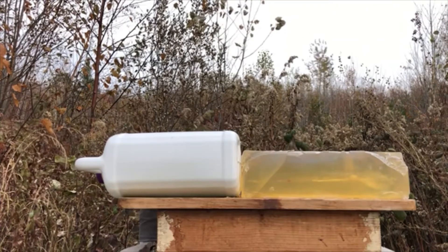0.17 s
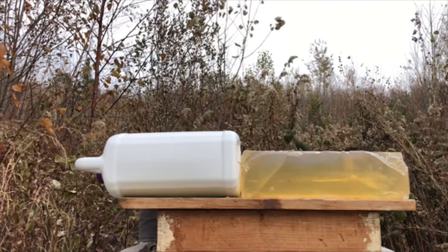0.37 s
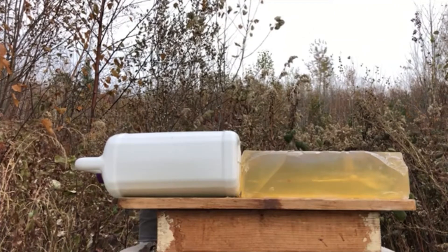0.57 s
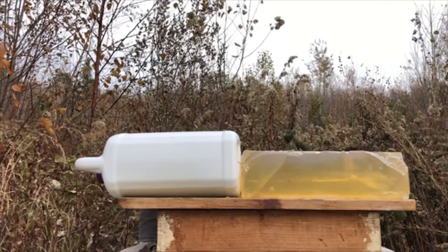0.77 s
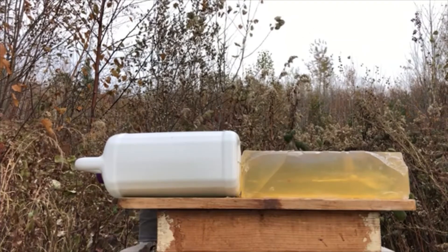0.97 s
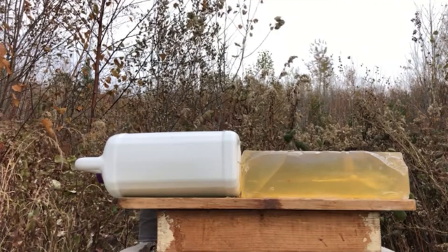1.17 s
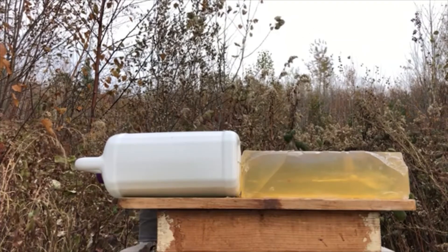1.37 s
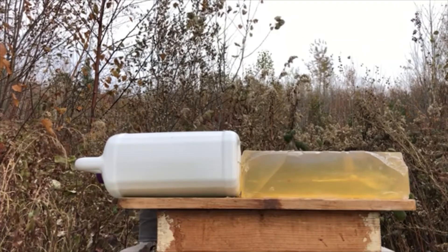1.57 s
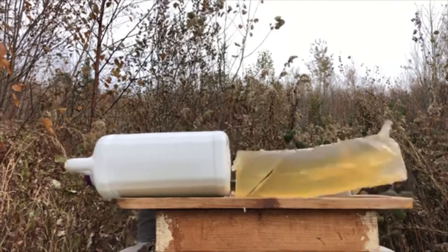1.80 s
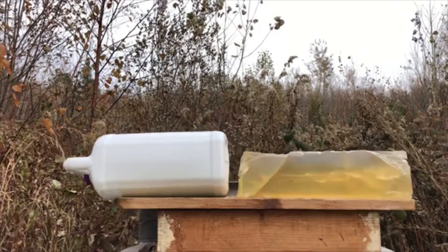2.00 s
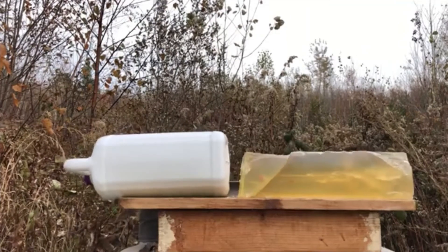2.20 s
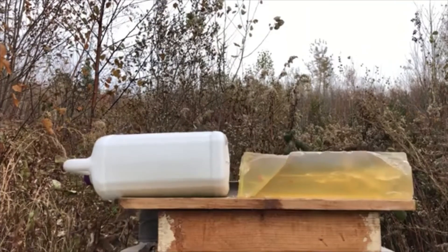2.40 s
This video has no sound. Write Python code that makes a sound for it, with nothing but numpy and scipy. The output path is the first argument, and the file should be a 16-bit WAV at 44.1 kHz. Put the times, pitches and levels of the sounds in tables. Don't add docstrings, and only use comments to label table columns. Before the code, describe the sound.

One close gunshot hits a plastic jug in scrubby woods, echoes rolling back and fading quickly

```python
import sys
import numpy as np
from scipy import signal
from scipy.fft import rfft, irfft, next_fast_len
from scipy.io import wavfile
from scipy.ndimage import map_coordinates

SR = 44100
rng = np.random.default_rng(int(sys.argv[2]) if len(sys.argv) > 2 else 0)


def int16_out(signal):
    q = np.round(np.clip(np.atleast_2d(signal).T, -1, 1) * 32767)
    wavfile.write(sys.argv[1], SR, q.astype(np.int16))


def rack_gain(trim_db):
    fader = np.asarray(trim_db, float)
    return 10 ** (fader / 20)


N = 107868
TOP_HZ = 15200

# (time [s], level [dB])
WIND = [
    (0, -63),
    (.3, -65),
    (.9, -68),
    (1.2, -69),
    (1.6, -68),
]
# (frequency [Hz], level [dB per Hz])
LEAF_COLOUR = [(70, -25), (120, -3), (300, -6), (700, -7), (1100, -10), (1400, -15), (2200, -24),
               (4000, -40)]
# (frequency [Hz], level [dB per Hz])
HISS_COLOUR = [(940, -30), (1600, 0), (2360, -4), (5500, -2.5), (7600, -8.5), (14300, -17.5), (15200, -22)]
HISS_DB = -71.3
# (frequency [Hz], level [dB per Hz])
RUMBLE_COLOUR = [(13, -39), (22, -9), (43, -1), (60, 0), (160, -11), (210, -41), (350, -120)]
RUMBLE_DB = -70.6
# (time [s], pitch [Hz], level [dB])
WHINE = [
    (0, 1241, -70),
    (.1, 1241, -67),
    (.17, 1241, -80),
    (.23, 1241, -74),
    (.5, 1241, -86),
    (1.09, 1242, -86),
    (1.13, 1242, -71),
    (1.3, 1243, -73),
    (1.5, 1243, -68),
]
DRONE_HZ, DRONE_WIDTH_HZ, DRONE_DB = 728, 12, -74.5
DUCK_S, DUCK_DB, RECOVER_S, RECOVER_DB_PER_S = 1.61, -14, 2.25, 25

# (time [s], peak [dB], pitch [Hz], half
# length [s])
KNOCKS = [(1.6215, -12, 755, .007), (1.623, -13, 1480, .006), (1.627, -32, 55, .007),
          (1.681, -30, 72, .008), (1.868, -55, 300, .008), (1.883, -40, 400, .009), (1.885, -60, 85, .014),
          (.2645, -56, 3760, .0008), (1.992, -65, 165, .014), (2.255, -62, 380, .012),
          (2.297, -72, 160, .012), (2.306, -59, 370, .01)]

# (time [s], peak [dB], pitch [Hz])
CRUMBS = [(.2885, -65, 5200), (1.2134, -65, 5400), (1.858, -55, 11000), (1.9724, -58, 10000),
          (2.0144, -68, 11000), (2.0194, -65, 11000), (2.03, -66, 13000), (2.1234, -67, 9500),
          (2.1374, -63, 13500), (2.18, -60, 3500), (2.1864, -58, 5000), (2.2124, -66, 8000),
          (2.2333, -59, 5500), (2.241, -65, 12000), (2.2974, -69, 7000), (2.3154, -65, 6000),
          (2.4385, -63, 11000)]
CRUMB_FADE_S, CRUMB_WIDTH = .002, .85
# (start [s], rise [s], hold [s], fall [s], level [dB])
PATTER = [
    (2.012, .008, .03, .012, -75),
    (2.12, .005, .03, .01, -80),
    (2.205, .01, .045, .02, -71),
    (2.27, .01, .045, .015, -77.5),
    (2.432, .004, .01, .01, -72),
]

# (start [s], rise [s], hold [s], fall [s], level [dB])
CRACK = [
    (1.6027, .001, .008, .001, -31),
    (1.613, .001, .005, .001, -38),
    (1.6213, .001, .005, .001, -32),
]
# (frequency [Hz], level [dB per Hz])
CRACK_COLOUR = [(180, -34), (300, -6), (1510, -2), (2300, -6), (3800, -12), (6000, -8), (12100, -13),
                (15200, -20)]
# (start [s], rise [s], hold [s], fall [s], level [dB])
BOOM = (1.606, .013, .009, .005, -9.6)
# (frequency [Hz], width [Hz], level [dB])
BOOM_BODY = [(210, 60, -13), (330, 90, -17), (500, 200, -2), (770, 260, 0.1), (1420, 420, -3.5),
             (2140, 280, -11), (2870, 300, -15)]
# (start [s], rise [s], hold [s], fall [s], level [dB])
SLAP = (1.6255, .001, .007, .0005, -11.5)
# (frequency [Hz], level [dB per Hz])
SLAP_COLOUR = [(1180, -38), (2000, -8), (4300, -3), (6000, -3), (11900, -7), (14900, -12), (15700, -30),
               (16500, -45)]
# (start [s], rise [s], hold [s], fall [s], level [dB])
THUMPS = [
    (1.606, .01, .02, .012, -44),
    (1.7, .02, .03, .065, -54),
]
# (frequency [Hz], level [dB per Hz])
THUMP_COLOUR = [(15, -12), (30, -3), (75, 0.1), (110, -4), (170, -10), (350, -16), (600, -45)]

# (start [s], rise [s], hold [s], fall [s], level [dB])
BRIEF_TONES = (1.63, .005, .011, .007, -15.5)
# (frequency [Hz], level [dB])
BRIEF_NOTES = [(211, -30), (414, -25), (503, -26), (597, -30), (1160, -26), (1215, -30), (1367, -29), (1638, -26.5),
               (3198, -31), (3698, -29), (5399, -31), (6153, -30)]

# (time [s], level [dB])
TREES = [
    (1.655, -25),
    (1.671, -31),
    (1.679, -23.5),
    (1.748, -22),
    (1.845, -37),
    (1.888, -36),
    (1.917, -44),
    (2.133, -54),
    (2.446, -56),
]
# (frequency [Hz], level [dB per Hz])
TREES_COLOUR = [(40, -36), (100, -27), (280, -23), (430, -13), (764, 0), (1120, -2), (1500, -9),
                (2300, -13), (8000, -62)]
# (frequency [Hz], loss [dB per s])
TREES_LOSS = [(60, 30), (180, 14), (330, -8), (800, 0.1), (2500, 2.5), (8000, 40)]
TRUNKS_PER_S, TRUNK_DB = 110, 2.6
LUMPS_FADE_S = .35
# (start [s], rise [s], hold [s], fall [s], level [dB])
SCRUB = [
    (1.644, .012, .085, .045, -27),
    (1.7, .1, .05, .16, -50),
]
# (frequency [Hz], level [dB per Hz])
SCRUB_COLOUR = [(1000, -25), (1800, -3), (2600, -3), (4500, -4), (7000, -6), (11000, -16), (15200, -25)]
# (frequency [Hz], loss [dB per s])
SCRUB_LOSS = [(1500, -10), (3500, -9), (5500, 9), (8500, 42), (14000, 80)]

CEILING = .98
# (time [s], treble lost above [Hz], first band kept [Hz], second band kept [Hz])
DULL = [
    (.73, 1600, 6200, 4100),
    (1.52, 1700, 4300, 5200),
    (2.008, 2200, 3500, 2700),
    (2.174, 6600, 6600, 5000),
    (2.263, 1900, 6000, 3800),
]
DULL_S, KEPT_WIDTH_HZ, KEPT_DB = .028, 60, 9.5


def unit(x):
    return x / np.sqrt(np.mean(x ** 2) + 1e-20)


def along(points, hz):
    f, value = np.transpose(points)
    return np.interp(np.log(hz + 1), np.log(f + 1), value)


def curves(rows):
    s, *columns = np.transpose(rows)
    return [np.interp(np.arange(N) / SR, s, column) for column in columns]


def wobble(rate):
    knots = rng.standard_normal(N // 100)
    return map_coordinates(knots, [np.arange(N) * rate / SR])


def noise(gain):
    m = next_fast_len(N)
    spectrum = rfft(rng.standard_normal(m)) * gain(np.fft.rfftfreq(m, 1 / SR))
    return unit(irfft(spectrum, m)[:N])


def tone(points, top_hz=TOP_HZ):
    return noise(lambda hz: rack_gain(along(points, hz)) * (hz < top_hz))


def peak(f, hz, width):
    return 1j * f * width / (hz * hz - f * f + 1j * f * width)


def burst(start, rise, hold, fall, db):
    t = np.arange(N) / SR - start
    up = np.sin(np.pi / 2 * np.clip(t / rise, 0, 1)) ** 2
    return rack_gain(db) * up * np.exp(-np.clip(t - rise - hold, 0, None) / fall)


def bursts(rows):
    return sum(burst(*row) for row in rows)


def air():
    t = np.arange(N) / SR
    wind_db, = curves(WIND)
    whine_hz, whine_db = curves(WHINE)
    leaves = rack_gain(wind_db + 1.2 * wobble(12) + 1.2 * wobble(70)) * tone(LEAF_COLOUR)
    hiss = rack_gain(HISS_DB + .7 * wobble(8) + 1.2 * wobble(150)) * tone(HISS_COLOUR)
    rumble = rack_gain(RUMBLE_DB + 2.5 * wobble(14)) * tone(RUMBLE_COLOUR)
    whine_wave = np.sqrt(2) * np.sin(2 * np.pi * np.cumsum(whine_hz) / SR)
    whine = rack_gain(whine_db + 1.5 * wobble(15)) * whine_wave
    drone = rack_gain(DRONE_DB - 4 * t) * noise(lambda f: peak(f, DRONE_HZ, DRONE_WIDTH_HZ))
    drop_db = DUCK_DB * np.clip((t - DUCK_S) / .02, 0, 1)
    duck_db = drop_db + RECOVER_DB_PER_S * np.clip(t - RECOVER_S, 0, None)
    ducked = rack_gain(duck_db) * (leaves + whine + drone + rack_gain(.45 * duck_db) * rumble)
    return ducked + rack_gain(.85 * duck_db) * hiss


def knocks():
    t = np.arange(N) / SR
    out = np.zeros(N)
    for s, db, hz, half in KNOCKS:
        shape = np.exp(-((t - s) / half) ** 2)
        out += rack_gain(db) * shape * np.sin(2 * np.pi * hz * (t - s))
    return out


def crumbs():
    n = SR // 40
    t, f = np.arange(n) / SR, np.fft.rfftfreq(n, 1 / SR)
    ticks = np.zeros(N + SR)
    for s, db, hz in CRUMBS:
        colour = (f < TOP_HZ) * peak(f, hz, CRUMB_WIDTH * hz) ** 2
        tick = unit(irfft(rfft(rng.standard_normal(n)) * colour, n))
        ticks[round(s * SR):][:n] += rack_gain(db) * tick * np.exp(-t / CRUMB_FADE_S)
    grains = tone([(2200, -20), (4500, 0.1), (15000, -3)])
    return ticks[:N] + bursts(PATTER) * rack_gain(3 * wobble(150)) * grains


def boom_gain(f):
    return sum((-1) ** k * rack_gain(db) * peak(f, hz, width) ** 2
               for k, (hz, width, db) in enumerate(BOOM_BODY))


def shot():
    crack = bursts(CRACK) * tone(CRACK_COLOUR)
    boom = burst(*BOOM) * noise(boom_gain)
    slap = burst(*SLAP) * tone(SLAP_COLOUR, 16600)
    jolt = bursts(THUMPS) * tone(THUMP_COLOUR)
    return crack + boom + slap + jolt


def brief_tones():
    t = np.arange(N) / SR
    phases = rng.random(len(BRIEF_NOTES))
    modes = sum(rack_gain(db) * np.sin(2 * np.pi * (hz * t + phase)) for (hz, db), phase in zip(BRIEF_NOTES, phases))
    return burst(*BRIEF_TONES) * unit(modes)


def travelled(colour, loss):
    hz, t, spectrum = signal.stft(tone(colour), SR, nperseg=256)
    travel_s = np.clip(t, 1.6, None) - 1.73
    fade = rack_gain(-along(loss, hz)[:, None] * travel_s)
    return signal.istft(spectrum * fade, SR, nperseg=256)[1][:N]


def woods():
    strength_db, = curves(TREES)
    opens = burst(1.645, .02, 9, 1, 0.5)
    lumps_db = TRUNK_DB * burst(1.6, .01, .2, LUMPS_FADE_S, 0.1) * wobble(TRUNKS_PER_S)
    trunks = opens * rack_gain(strength_db + lumps_db) * travelled(TREES_COLOUR, TREES_LOSS)
    bushes = bursts(SCRUB) * rack_gain(.8 * wobble(60)) * travelled(SCRUB_COLOUR, SCRUB_LOSS)
    return trunks + bushes


def dull_moments(x):
    t, f, spectrum = np.arange(N) / SR, np.fft.rfftfreq(N, 1 / SR), rfft(x)
    for s, above_hz, *kept_hz in DULL:
        treble = np.clip((f - above_hz) / 400 + .5, 0, 1) ** 2
        kept = rack_gain(KEPT_DB) * sum(np.exp(-((f - hz) / KEPT_WIDTH_HZ) ** 2) for hz in kept_hz)
        bump = np.cos(np.pi * np.clip((t - s) / DULL_S, -.5, .5)) ** 2
        x = x - np.clip(1.1 * bump, 0, .92) * irfft(spectrum * (treble - kept), N)
    return x


def scene():
    return (air() + knocks() + crumbs() + shot() + brief_tones() + woods())[None]


def band_limit(x):
    return signal.sosfilt(signal.butter(12, 16620, fs=SR, output="sos"), x)


def record(dry):
    limited = dry / (1 + np.abs(dry / CEILING) ** 6) ** (1 / 6)
    return band_limit(dull_moments(limited))


dry = scene()
out = record(dry)
int16_out(out)
```